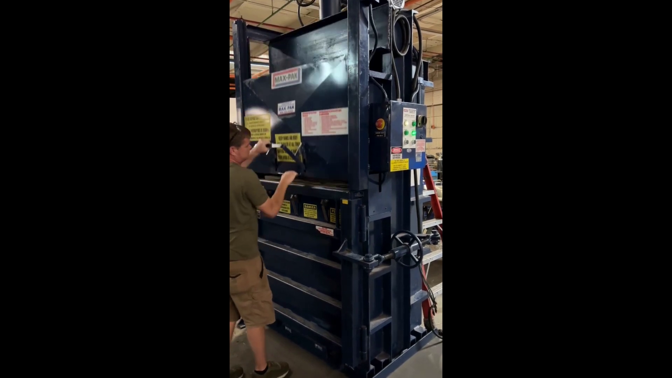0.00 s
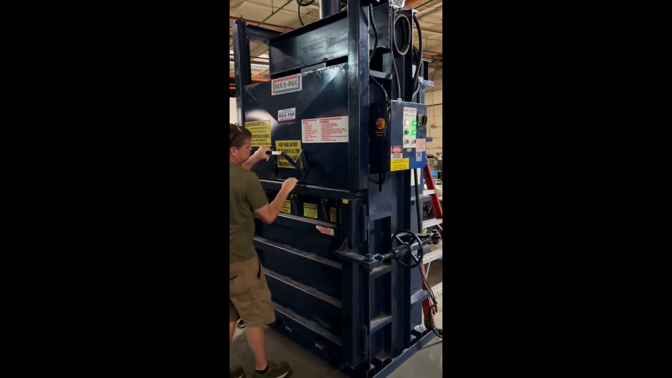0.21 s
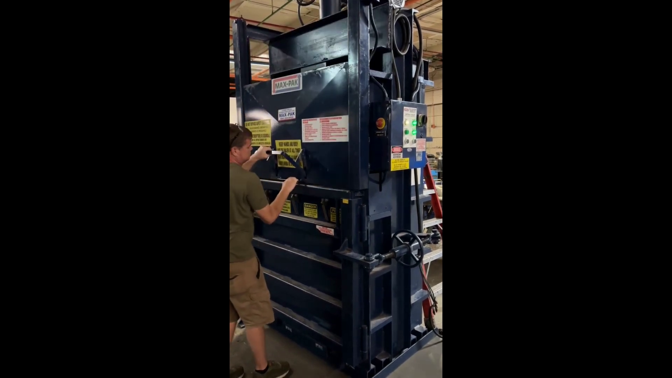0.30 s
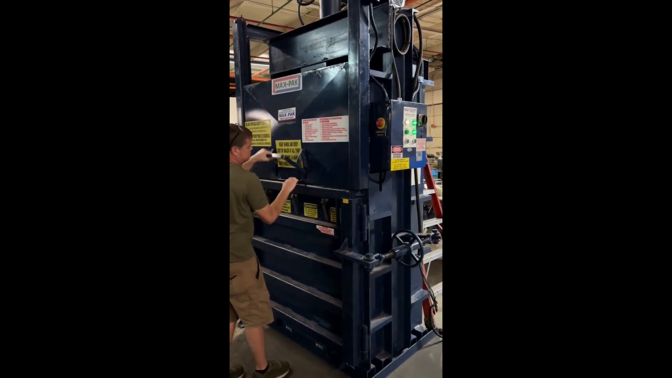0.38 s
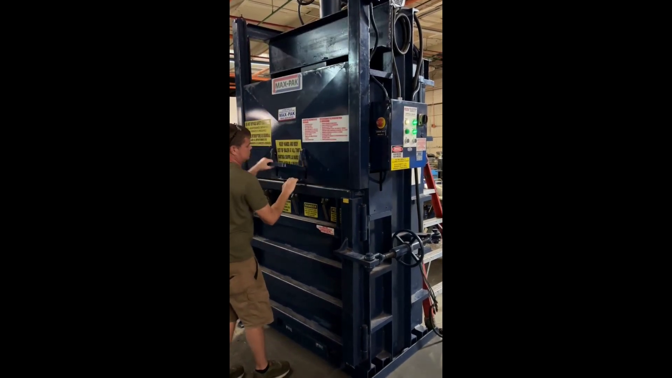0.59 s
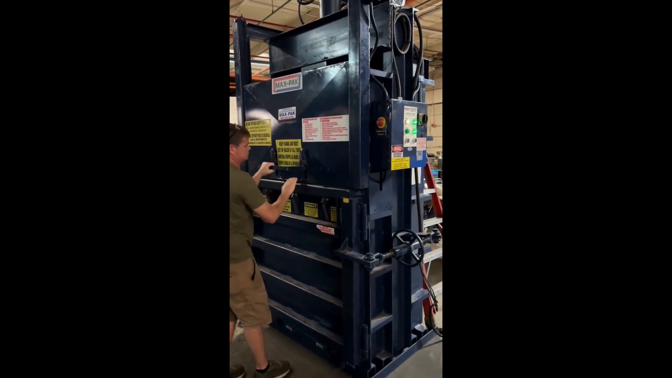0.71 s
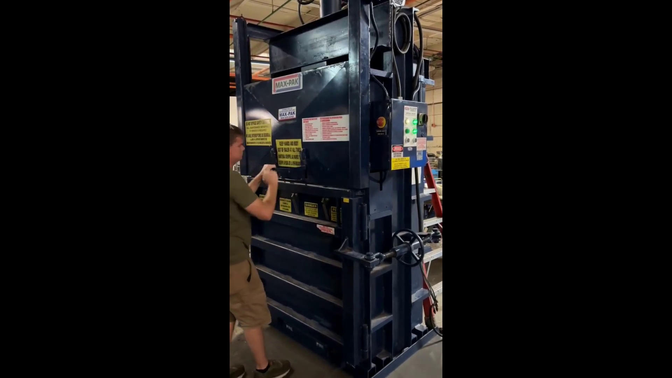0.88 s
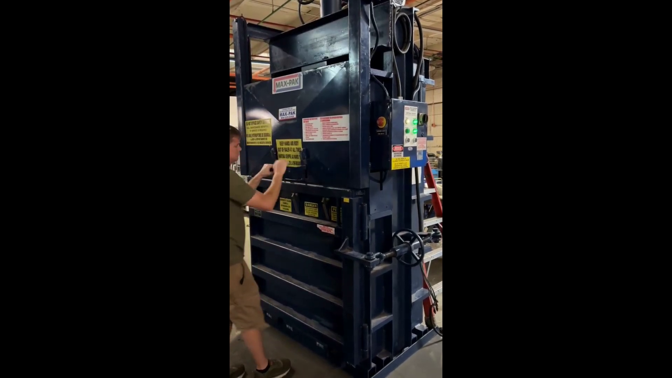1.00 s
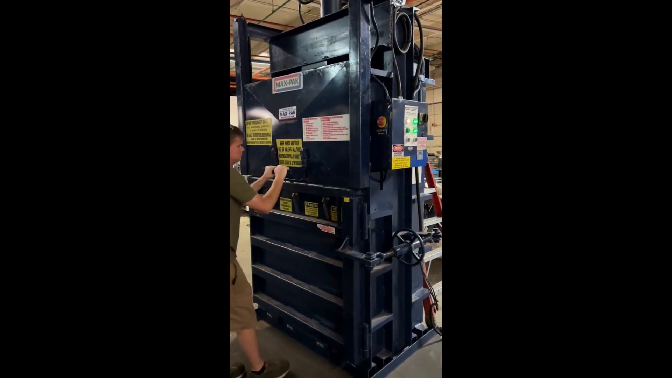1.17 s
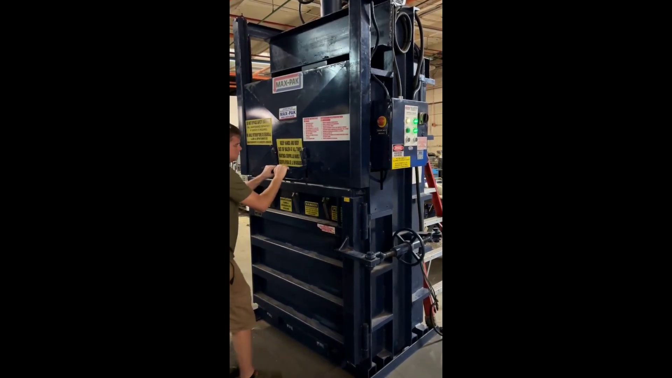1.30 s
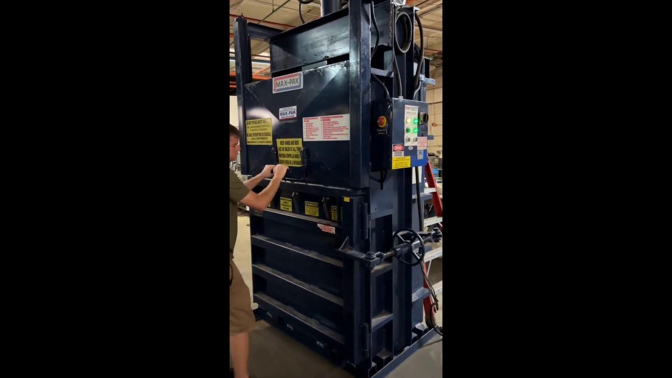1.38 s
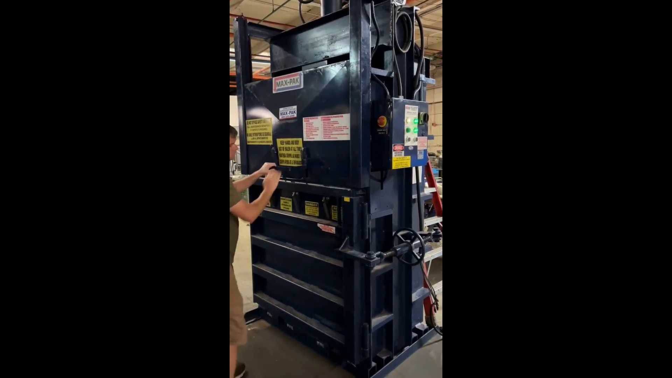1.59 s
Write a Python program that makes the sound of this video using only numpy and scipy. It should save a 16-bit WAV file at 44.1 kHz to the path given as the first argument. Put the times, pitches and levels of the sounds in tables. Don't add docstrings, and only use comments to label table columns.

```python
import sys
import numpy as np
from scipy import signal
from scipy.fft import rfft, irfft, next_fast_len
from scipy.io import wavfile
from scipy.ndimage import uniform_filter1d

SR = 44100
rng = np.random.default_rng(int(sys.argv[2]) if len(sys.argv) > 2 else 0)


def wav_out(sig):
    wavfile.write(sys.argv[1], SR, np.round(np.clip(np.atleast_2d(sig).T, -1, 1) * 32767).astype(np.int16))


def gain_from_db(level_db):
    decades = np.asarray(level_db, float) / 20
    return 10 ** decades


N = 70560
LEAD = SR // 4


def along(points, hz):
    f, v = np.transpose(points)
    return np.interp(np.log(hz + 1), np.log(f + 1), v)


def dying(seconds, spectrum, t60s, size):
    noise = rng.standard_normal((2, round(seconds * SR)))
    hz, t, z = signal.stft(noise, SR, nperseg=size)
    colour = gain_from_db(along(spectrum, hz))
    decay = gain_from_db(-60 * t / along(t60s, hz)[:, None])
    gain = colour[:, None] / np.sqrt(np.mean(colour ** 2)) * decay
    return signal.istft(z * gain, SR, nperseg=size)[1][:, :round(seconds * SR)]


def ring(modes, t, rise_s, blur_hz, scatter_db):
    hz, db, t60 = np.transpose(modes)[:, :, None]
    hz = hz * (1 + 0.015 * np.clip(500 / hz, 0, 1) ** 2 * rng.standard_normal(hz.shape))
    steps = rng.standard_normal((len(modes), len(t) // 64 + 2))
    walk = np.cumsum(steps, axis=1) * np.sqrt(2 * np.pi * blur_hz * 64 / SR)
    wander = [np.interp(t * SR / 64, np.arange(len(w)), w) for w in walk]
    phase = 2 * np.pi * hz * t + wander
    strength = gain_from_db(db.T + scatter_db * rng.standard_normal((2, len(modes))))
    size = strength * np.exp(2j * np.pi * rng.random((2, len(modes))))
    sound = np.real(size @ (gain_from_db(-60 * t / t60) * np.exp(1j * phase)))
    return sound * (1 - np.exp(-t / rise_s)) / np.sqrt(np.sum(gain_from_db(db) ** 2) / 2)


def place(out, s, blow):
    fade = np.cos(np.pi / 2 * np.linspace(0, 1, blow.shape[1]))
    out[:, LEAD + round(s * SR):][:, :blow.shape[1]] += blow * fade


def air():
    # (frequency [Hz], density [dB per Hz])
    murmur = [(20, -17.5), (50, 21), (220, -19), (600, -6.5), (1500, -16.5), (5000, -27.5), (9000, -52),
              (13000, -38)]
    m = next_fast_len(N)
    spectrum = rfft(rng.standard_normal((2, m))) * gain_from_db(along(murmur, np.fft.rfftfreq(m, 1 / SR)))
    x = irfft(spectrum, m)[:, :N]
    return gain_from_db(-44.5) * x / np.std(x)


def hall(x):
    # (frequency [Hz], t60 [s])
    hall_t60 = [(60, 1.53), (250, 1.183), (1000, 1.316), (4000, 1.255), (12000, 0.64)]
    delay_s = 0.0056
    tail = dying(1.5, [(100, 10), (1000, -1.5), (10000, -0.5)], hall_t60, size=512)
    tail = tail * (1 - np.exp(-np.arange(tail.shape[1]) / SR / delay_s))
    return signal.fftconvolve(x, tail / np.linalg.norm(tail[0]), axes=1)[:, :x.shape[1]]


def landings():
    # (time [s], frame [dB], bar [dB], pins [dB])
    hard_landings = [
        (0.206, -40, -11.5, -50),
        (0.222, -11, -40, -50),
        (0.281, -20, -14, -44),
        (0.296, -40, -40, -36),
        (0.443, -34, -28, -43),
        (1.158, -22, -36, -60),
        (1.173, -40, -11, -60),
    ]
    # (frequency [Hz], level [dB], t60 [s])
    frame_modes = [(86, 0, .38), (62, -14, .25)]
    bar_modes = [(622, 0, .075), (690, -7, .06), (742, -1, .075), (900, -5, .06)]
    pin_modes = [(11870, 11, 0.22), (11020, -7.5, 0.75), (14000, -19, 0.11), (14250, -1.5, .06)]
    # (time [s], frequency [Hz], level [dB], t60 [s])
    panel_drums = [
        (0.071, 214, -32.5, 0.74),
        (0.305, 320, -18, 0.28),
        (0.322, 272.6, -14.5, 0.33),
        (0.37, 217.6, -25, 0.23),
        (1.19, 410.2, -23.5, 0.36),
        (1.198, 163, -20.5, 0.71),
        (1.245, 240, -27.5, 1.35),
    ]
    frame_rise_s, bar_rise_s = 0.014, 0.004
    out, t = np.zeros((2, N + LEAD + SR)), np.arange(round(0.45 * SR)) / SR
    for s, frame_db, bar_db, pins_db in hard_landings:
        thud = gain_from_db(frame_db) * ring(frame_modes, t, frame_rise_s, blur_hz=1, scatter_db=1)
        knock = gain_from_db(bar_db) * ring(bar_modes, t, bar_rise_s, blur_hz=3, scatter_db=1)
        jingle = gain_from_db(pins_db) * ring(pin_modes, t, bar_rise_s, blur_hz=8, scatter_db=0)
        place(out, s, thud + knock + jingle)
    for s, hz, db, t60 in panel_drums:
        drum = ring([(hz, 0, t60)], t, frame_rise_s, blur_hz=3.2, scatter_db=3.5)
        place(out, s, gain_from_db(db) * drum)
    return out[:, :N + LEAD]


def gate():
    # (time [s], tick [dB], crack [dB], clang [dB], boom [dB])
    gate_blows = [(-0.12, -30, -29.5, -21.5, -23.5), (0.045, -42.5, -44.5, -40, -68),
                  (0.188, -50, -43, -57, -27), (0.205, -53, -22, -14.5, -15), (0.234, -27, -21, -29, -11.5),
                  (0.282, -31, -22, -50, -13.5), (0.295, -20, -20, -19.5, -18),
                  (0.303, -30.5, -19.5, -24, -23), (0.335, -49, -33, -47, -17.5),
                  (0.384, -54, -36.5, -36, -19.5), (0.432, -58, -30.5, -23.5, -31),
                  (0.443, -31, -43, -28.5, -41.5), (0.455, -47, -35.5, -25.5, -27.5),
                  (0.51, -51, -50, -28, -40), (0.642, -45.5, -32, -32.5, -23),
                  (0.66, -75, -44.5, -24.5, -43), (1.146, -51, -45.5, -38, -44),
                  (1.154, -30.5, -31, -19.5, -15), (1.172, -59, -25, -21, -25.5), (1.2, -84, -47, -16, -26),
                  (1.259, -71, -43, -28.5, -25.5), (1.345, -71, -63, -34.5, -37),
                  (1.573, -70, -62.5, -52, -40)]
    # (frequency [Hz], t60 [s])
    tick_colour = [(2000, -18), (7000, 3), (12000, 13.5), (16000, 1)]
    tick_t60 = [(4000, 0.09), (14000, 0.087)]
    # (frequency [Hz], t60 [s])
    crack_colour = [(120, -16), (300, 8), (900, 1.5), (2500, -0.5), (5500, -5.5), (8500, -9),
                    (12000, -15.5), (16000, -35.5)]
    crack_t60 = [(300, 0.53), (1500, 0.22), (5000, 0.2), (14000, 0.19)]
    # (frequency [Hz], level [dB], t60 [s])
    sheet_modes = [(352.3, -7.5, 0.12), (409.8, -7.5, 0.14), (504.7, -10.5, 0.19), (570, -4, 0.12),
                   (620.2, -10, 0.3), (664, -7, 0.22), (713.4, -4.5, 0.16), (922.4, -12.5, 0.033),
                   (1041.6, -4, .1), (1408, -7, 0.13), (1560, -6.5, 0.027), (1911, -8, 0.039),
                   (2343, -13, 0.11), (2830, -15.5, 0.18)]
    box_modes = [(125.2, -7, 0.46), (159.1, -5.5, 0.32), (189.7, -9, 0.21), (212.2, -4, 0.31),
                 (240, -3, 0.26), (278.9, 0.5, .16), (320, -3, .14)]
    noise_rise_s, sheet_rise_s, box_rise_s = 0.00083, 0.00092, 0.0058
    out, t = np.zeros((2, N + LEAD + SR)), np.arange(round(0.3 * SR)) / SR
    for s, tick_db, crack_db, clang_db, boom_db in gate_blows:
        crack = gain_from_db(crack_db + 5.5) * dying(len(t) / SR, crack_colour, crack_t60, size=128)
        tick = gain_from_db(tick_db) * dying(len(t) / SR, tick_colour, tick_t60, size=64)
        noise = (crack + tick) * (1 - np.exp(-t / noise_rise_s))
        clang = gain_from_db(clang_db) * ring(sheet_modes, t, sheet_rise_s, blur_hz=27, scatter_db=3)
        boom = gain_from_db(boom_db) * ring(box_modes, t, box_rise_s, blur_hz=11.35, scatter_db=2.5)
        place(out, s, noise + clang + boom)
    return out[:, :N + LEAD]


def ports(pair):
    # (frequency [Hz], likeness of the ports [0..1])
    likeness = [(100, .999), (500, .95), (1300, .82), (2300, .5), (4300, .25), (5600, .95), (9000, .93),
                (13000, .55)]
    # (frequency [Hz], lag [half turns])
    port_lag = [(0, 0), (500, .13), (1200, .22), (1900, -.1), (2600, -1), (3400, -1.1), (4200, -.4),
                (5750, -1), (6400, -1), (7500, -2), (8800, -2), (9700, -3), (10800, -3), (12200, -4),
                (13000, -4), (14000, -4.6)]
    # (frequency [Hz], left over right [dB])
    port_lean = [(100, 0), (400, 1), (900, 3), (1500, 2.5), (2500, -4.5), (3600, -1), (5500, 0)]
    mic_low_hz = 45
    m = next_fast_len(N + SR // 4)
    hz = np.fft.rfftfreq(m, 1 / SR)
    shared, differing = rfft(pair, m) * (1j * hz / (mic_low_hz + 1j * hz)) ** 2
    angle = np.arccos(np.clip(along(likeness, hz), -1, 1)) / 2
    shared, differing = np.cos(angle) * shared, np.sin(angle) * differing
    lag = np.exp(-0.5j * np.pi * np.interp(hz, *np.transpose(port_lag)))
    tilt = lag * gain_from_db(along(port_lean, hz) / 2)
    return irfft([(shared + differing) * tilt, (shared - differing) / tilt], m)[:, :N]


def muted(x):
    # (frequency [Hz], depth [dB])
    under_loudest = [(5400, 66), (8500, 60), (10000, 48), (12000, 46), (14000, 44), (16000, 40)]
    band_hz, mute_from_hz = 430, 5400
    under_other_db, waver_db = 7.5, 6
    hz, _, z = signal.stft([x[0] + x[1], x[0] - x[1]], SR, nperseg=1024)
    band = (hz // band_hz).astype(int)
    bands = range(band.max() + 1)
    power = np.array([[np.mean(np.abs(c[band == b]) ** 2, axis=0) for b in bands] for c in z])
    level = 10 * np.log10(uniform_filter1d(power, size=3, axis=2) + 1e-20)
    waver = uniform_filter1d(rng.standard_normal(level.shape), size=9, axis=2) * 3 * waver_db
    centre = (np.arange(level.shape[1]) + 0.5) * band_hz
    upper = centre > mute_from_hz
    under_other = level < level[::-1] - under_other_db
    floor = level.max(axis=(0, 1)) - along(under_loudest, centre)[:, None]
    weak = under_other | (level + waver < floor)
    treble = 10 * np.log10(power[:, upper].sum(axis=(0, 1)) + 1e-20)
    sudden = np.diff(treble, prepend=treble[0]) > 6
    keep = ~(weak & upper[:, None] & ~sudden)
    mid, side = signal.istft(z * keep[:, band], SR, nperseg=1024)[1][:, :N]
    return np.array([mid + side, mid - side]) / 2


def scene():
    blows, near = gate(), landings()
    feed = blows + gain_from_db(-12) * near
    steel = blows + near + gain_from_db(-9) * hall(feed)
    return ports(steel[:, LEAD:] + air())


def top_cut(x):
    return signal.sosfilt(signal.butter(12, 16330, fs=SR, output="sos"), x)


def record(dry):
    soft = dry / (1 + np.abs(dry / 1.2) ** 4) ** (1 / 4)
    return top_cut(muted(soft))


dry = scene()
out = record(dry)
wav_out(out)
```